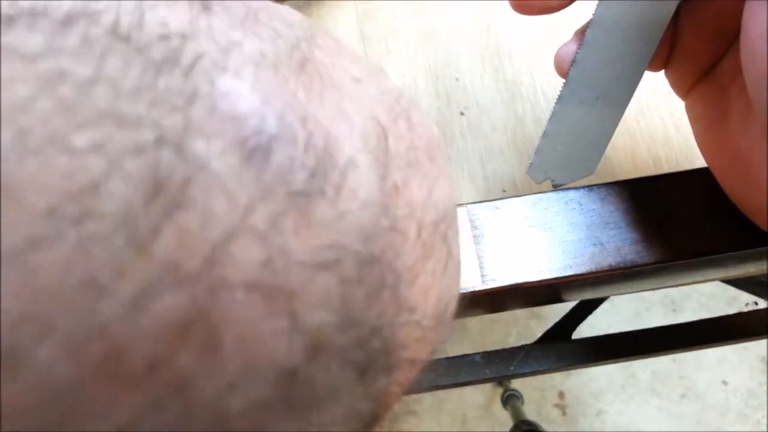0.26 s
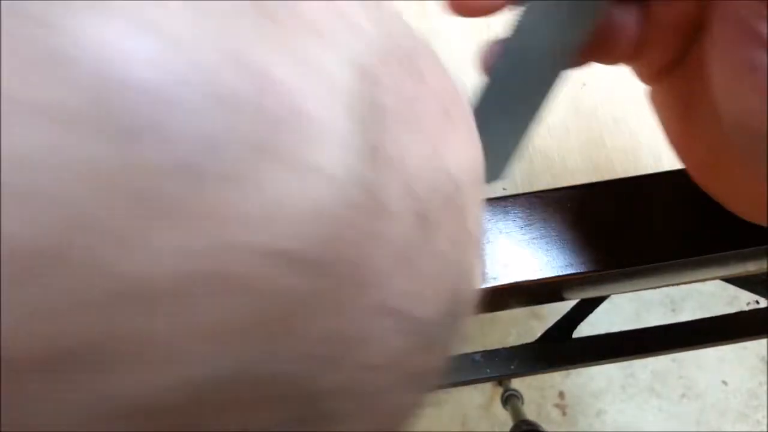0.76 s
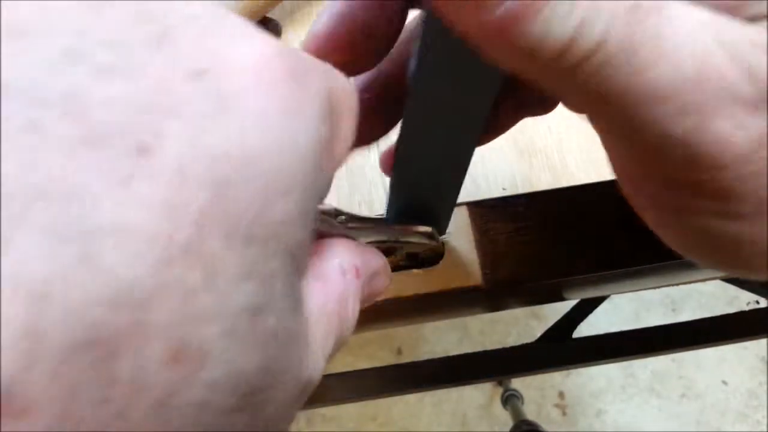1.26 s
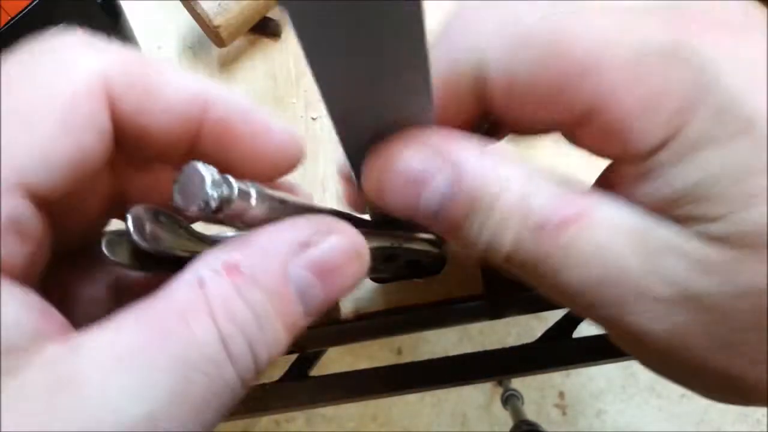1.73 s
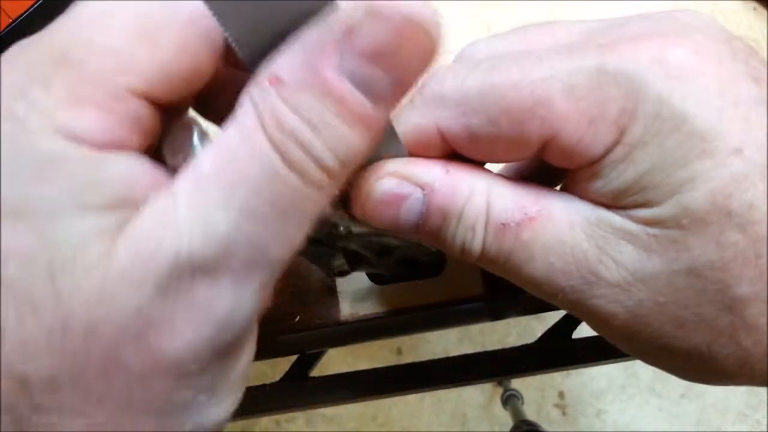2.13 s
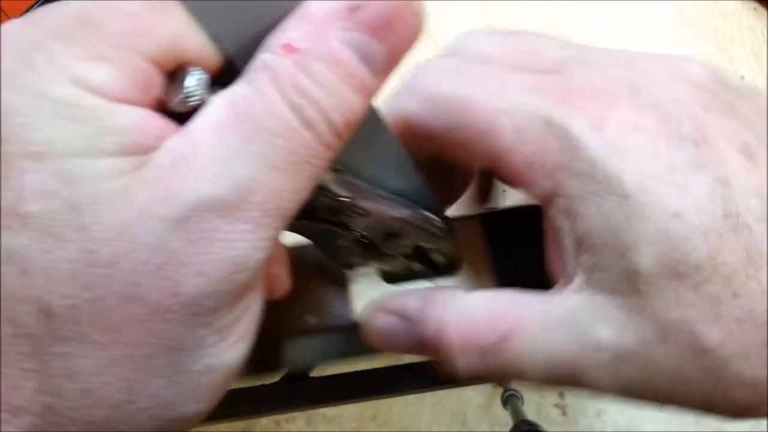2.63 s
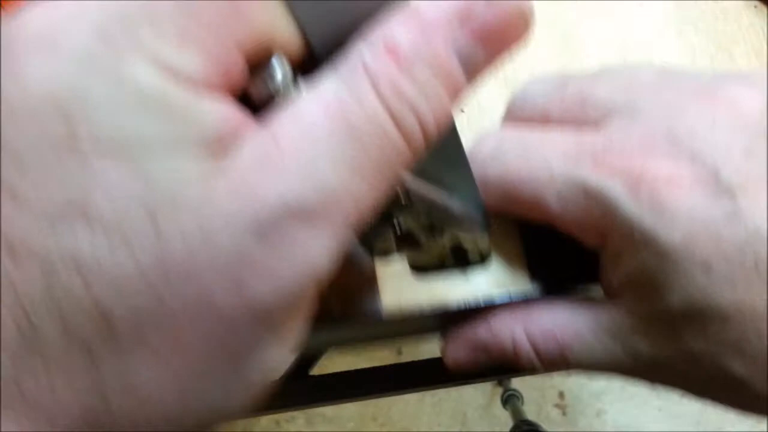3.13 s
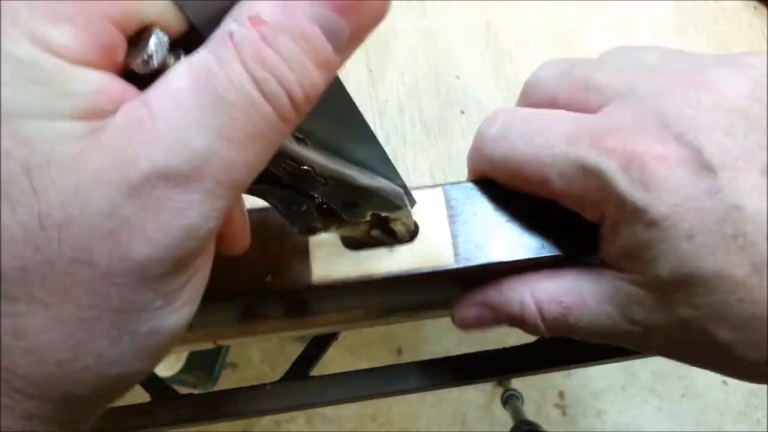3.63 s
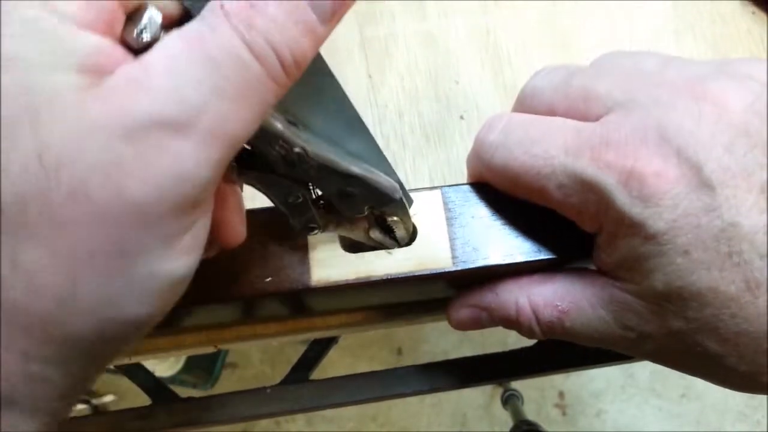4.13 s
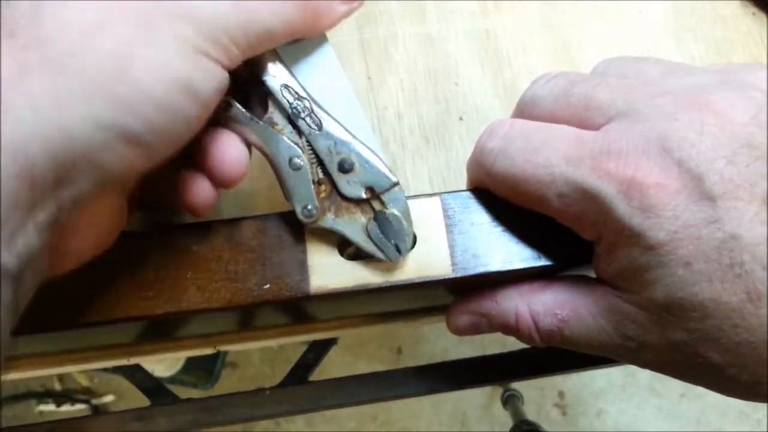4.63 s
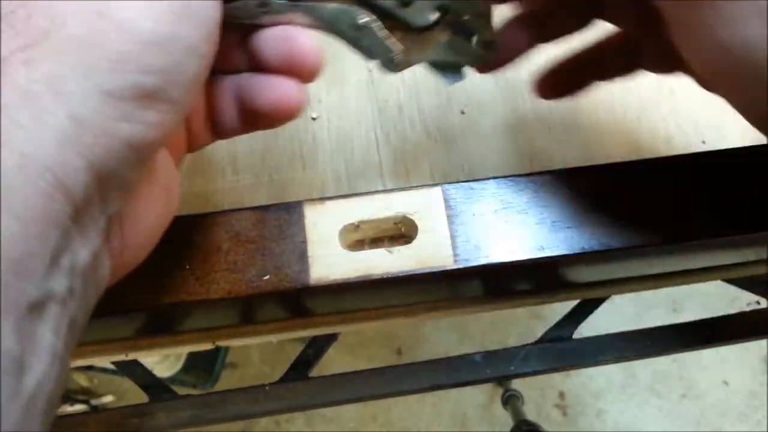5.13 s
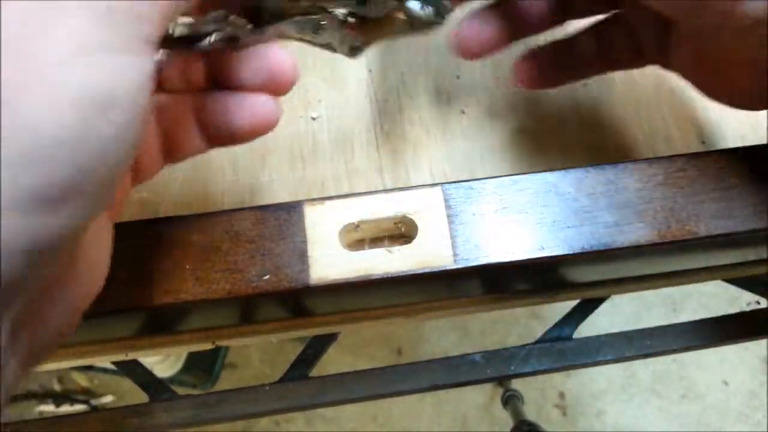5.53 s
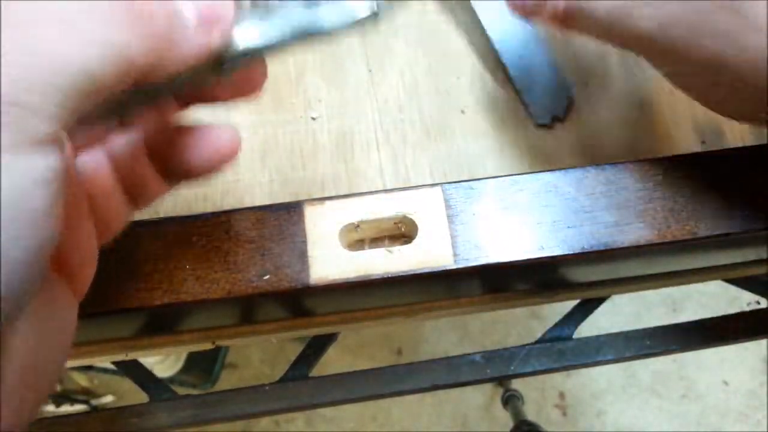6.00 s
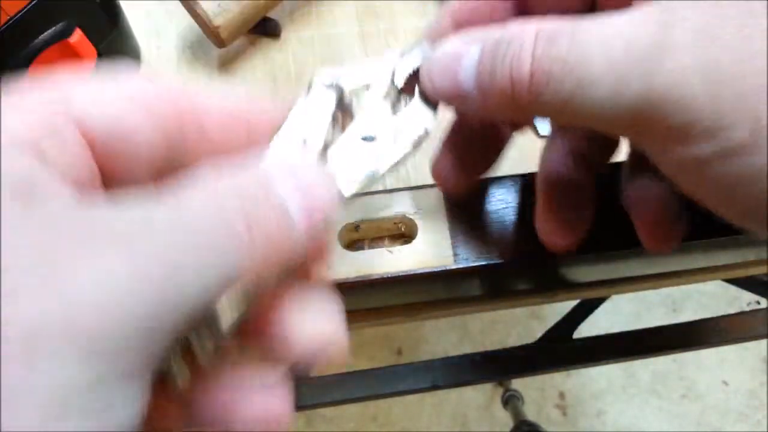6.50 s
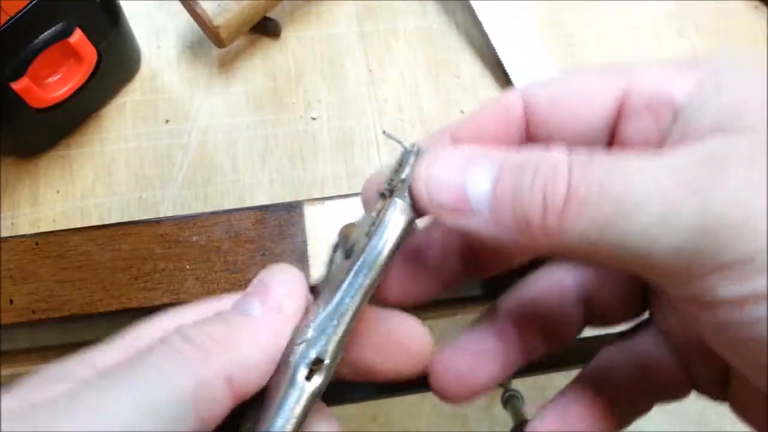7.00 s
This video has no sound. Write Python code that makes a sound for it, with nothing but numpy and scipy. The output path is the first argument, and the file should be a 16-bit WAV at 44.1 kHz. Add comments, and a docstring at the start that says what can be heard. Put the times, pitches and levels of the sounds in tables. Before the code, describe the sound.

Sharp clack, quiet tool fumbling, heavy woody thuds of pliers levering on a rail, then a thin steel plate rattles down, over hiss and ticking.

```python
"""Locking pliers lever a staple out of a wooden rail over a steel plate, close to a phone on a workshop bench.
Blows excite decaying modes of wood and steel and bursts of filtered noise; strokes are fluctuating noise
through resonances. At last the plate is dropped and chatters to rest in a hail of tiny impacts.
The shop answers the blows with a diffuse tail. Behind them lie a steady hiss and, almost wholly in the left
port, an electric tick thirty times a second."""
import sys
import numpy as np
from scipy import signal
from scipy.fft import rfft, irfft, next_fast_len
from scipy.io import wavfile
from scipy.ndimage import map_coordinates

SR = 44100
rng = np.random.default_rng(int(sys.argv[2]) if len(sys.argv) > 2 else 0)


def file_out(sig):
    """Save sig as 16-bit WAV at sys.argv[1]."""
    # one column per channel
    cols = np.atleast_2d(sig).T
    # limit, then scale
    lim = np.clip(cols, -1, 1)
    pcm = np.round(lim * 32767).astype(np.int16)
    wavfile.write(sys.argv[1], SR, pcm)


N = 319936

# Contacts of tools, rail and bench: (time [s], wood level [dB], wood centre [Hz], snap level [dB],
# hardness [dB], contact decay scale [s])
KNOCKS = [(.487, -37.5, 366, -26, -11, 0.011), (.521, -43, 256, -39, 9, 0.036),
          (0.5484, -12.5, 381, -2, -3, .012), (.5555, -29, 314, -13.5, -8, 0.01),
          (0.563, -20.5, 250, -37, -5, .017), (.822, -36, 298, -46, -6, .03),
          (.864, -33, 545, -58, -4, .03), (1.014, -47, 310, -37.5, 0.5, .044),
          (1.199, -39, 270, -56, -13, .025), (1.251, -36.5, 317, -65, 2, .03),
          (1.329, -39.5, 412, -56, 7, 0.033), (1.359, -29.5, 363, -49, -2, .053),
          (1.649, -37.5, 325, -46, -10, .03), (1.697, -39, 378, -45, 0, .03),
          (1.733, -32, 394, -65, 10.5, .03), (1.771, -40, 370, -44.5, 0.5, .065),
          (1.829, -53, 215, -51.5, 6.5, .04), (1.995, -27, 338, -41, -0.5, .054),
          (2.014, -26.5, 322, -54, 9.5, .03), (2.196, -27, 302, -41.5, 0, 0.027),
          (2.277, -41, 313, -39, 2.5, .048), (2.309, -36, 303, -71, 2, .025),
          (2.4, -42, 330, -39, -18, 0.04), (2.414, -30, 318, -49, 1, .026),
          (2.494, -35.5, 434, -37, -17, 0.022), (2.818, -27, 325, -42, -6, .03),
          (2.859, -26, 300, -23.5, -9, 0.057), (2.865, -1, 270, -11.5, -11, .029),
          (2.875, -3, 494, -11, -8.5, 0.03), (2.887, -9.5, 212, -22.5, -6, 0.099),
          (2.933, -21, 229, -39.5, 0, 0.21), (3.484, -5.5, 510, -3.5, -11, 0.035),
          (3.491, -3, 261, -19, -8, 0.008), (3.775, -37.5, 380, -37, -4, 0.14),
          (4.016, -40.5, 470, -31.5, -1.5, 0.029), (4.074, -47, 374, -39, 4.5, 0.035),
          (4.628, -32, 377, -34, -8, .04), (4.635, -4, 366, -16, -10, 0.028),
          (4.639, -14.5, 620, -21.5, -15, 0.022), (4.649, -15, 388, -32, -13, 0.13),
          (4.680, -16, 503, -23, -3.5, 0.025), (4.684, -9, 350, -31, -10, .03),
          (4.728, -31, 325, -49, -6, .023), (4.976, -32.5, 340, -36.5, -1, 0.03),
          (5.3006, -28.5, 524, -34, -11, .018), (5.319, -35, 239, -55, 2, .025),
          (5.35, -48, 242, -42.5, 10.5, .043), (5.379, -32, 298, -53, -5, .03),
          (5.387, -27.5, 400, -32.5, -9, 0.013), (5.439, -45, 275, -44.5, 6, .041),
          (5.509, -54, 229, -47.5, 7.5, 0.042), (5.664, -42, 277, -39, 4, 0.034),
          (6.504, -35, 260, -53, 1, 0.044), (6.548, -32, 552, -36.5, -0.5, 0.057),
          (6.574, -36.5, 226, -42, 0.5, 0.027)]
# Steel on steel: (time [s], ring level [dB], centre [Hz], span excited [octaves], share of free ring time [1])
CLINKS = [(0.341, -40.5, 3470, 0.43, .3), (0.399, -36, 3500, 0.39, 0.41), (.549, -1, 1890, 0.25, 0.14),
          (.550, -13, 3080, .1, 0.39), (.549, -21, 9300, 0.12, 0.96), (1.015, -33, 1427, 0.13, 0.83),
          (1.015, -39.5, 845, .1, 1), (1.016, -29.5, 4430, 0.47, 0.33), (1.359, -43, 1100, .15, 0.73),
          (1.699, -38, 1100, .15, 0.59), (1.772, -41, 1427, 0.13, 0.9), (2.015, -41.5, 1100, .15, 0.98),
          (2.278, -44, 3000, 0.15, .4), (4.681, -41.5, 3851, .06, 0.35), (4.975, -41, 2770, .15, .2),
          (5.301, -43.5, 2560, 0.05, 0.65), (5.301, -40, 4300, .08, 0.49), (5.387, -35, 1100, 0.15, 0.44),
          (5.388, -38, 4200, 0.15, 0.3), (5.993, -28, 3851, .04, 0.91)]
# The dropped plate meets the bench: (time [s], wood level [dB], wood centre [Hz], flex level [dB],
# clang level [dB], edge ring level [dB])
DROPS = [(5.9925, -8, 644, -13, -5.5, -27.5), (6.002, -8.5, 492, -24, -41, -55),
         (6.083, -5.5, 353, -12.5, -22, -38), (6.101, -14.5, 427, -31, -31, -29),
         (6.139, -10.5, 285, -9.5, 0.5, -8.5), (6.166, -38, 293, -11, -22, -16.5),
         (6.193, -14, 263, -12.5, -7.5, -10), (6.235, -21, 410, -9.5, -11, -24),
         (6.264, -26, 410, -24, -12, -17)]
# Strokes of hands dragging steel and wood over the bench: (time [s], length [s], rumble level [dB],
# rasp level [dB], scrape level [dB], change of level along the stroke [dB])
RUBS = [(0.727, 0.291, -43.5, -55, -57, -7), (1.04, .24, -50.5, -60, -59.5, -2),
        (1.614, .34, -51.5, -56.5, -78, -8.5), (2.2, .36, -56.5, -80, -98, -2),
        (2.753, 0.053, -47, -46.5, -58, 6.5), (2.784, 0.1, -40, -41.5, -56, -3),
        (3.541, 0.2, -35.5, -42.5, -60, -10.5), (3.79, 0.048, -45, -39.5, -51.5, -15),
        (5.316, 0.068, -45.5, -50.5, -53.5, 2.5), (5.419, .5, -48.5, -54, -52.5, -4.5)]

# Modes of the wood: (frequency [Hz], relative level [dB], free t60 [s])
WOOD_MODES = [(195, -10, 0.05), (232, 7.5, 0.038), (257, -8, 0.064), (276, -4.5, 0.1), (321, 7.5, 0.069),
              (371, -3.5, 0.1), (417, 9.5, 0.062), (515, 6.5, 0.095), (610, 7, 0.051), (650.6, 1, 0.15),
              (703, 7, 0.08)]
# Modes of the pliers: (frequency [Hz], relative level [dB], free t60 [s])
PLIERS_MODES = [(845, -2, .08), (1100, -2, .1), (1427, -2, .11), (1950, -6, .08), (2083, 0, .11),
                (2191, -4, .25), (2350, -5, .12), (2530, -3, .2), (3079, 0, .22), (3851, -14, .35),
                (4300, -4, .15), (5200, -4, .08), (8600, -4, .1), (8900, -2, .1), (9205, 0, .14),
                (9450, -2, .1), (9771, -2, .14), (10100, -3, .1)]
# Flexing modes of the plate: (frequency [Hz], relative level [dB], free t60 [s])
FLEX_MODES = [(1050, -8, .04), (1250, -8, .04), (1390, 0, .06), (1480, -5, .04), (1700, -7, .03),
              (1900, -6, .04), (2128, 0, .06), (2257, -2, .05), (2500, -5, .04), (2650, -7, .03)]
# Clanging modes of the plate: (frequency [Hz], relative level [dB], free t60 [s])
CLANG_MODES = [(2821, -4, .05), (3025, -5, .05), (3300, -6, .04), (3537, -4, .05), (3851, -13, .2),
               (4120, -7, .05), (4500, 0, .04), (4800, -5, .03), (5400, -14, .03), (6200, -12, .03),
               (6600, -8, .04), (6934, -6, .06), (7549, -18, .15)]
# High edge modes of the plate: (frequency [Hz], relative level [dB], free t60 [s])
EDGE_MODES = [(8150, -20, .12), (9000, -15, .15), (9905, -14, .13), (10409, -9, .16), (10821, -7, .12),
              (11097, -11, .3), (11505, 0, .15), (12233, 0, .12), (12870, -5, .1), (13652, -10, .14),
              (14041, -12, .14), (14520, -8, .15)]

# Rail resonances: (frequency [Hz], width [Hz], relative level [dB])
RAIL_PEAKS = [(811, 121, -0.5), (1105, 103, 0.5), (1310, 158, 1), (1493, 480, -4), (1960, 420, -5)]
# Spectrum of the crack of a contact: (frequency [Hz], relative density [dB per Hz])
CRACK_SPECTRUM = [(1500, -38.5), (2100, -7), (3100, -2.5), (4500, -9.5), (6000, -28)]
# Spectrum of the brightest spray of a contact: (frequency [Hz], relative density [dB per Hz])
SPRAY_SPECTRUM = [(4500, -30), (6500, 2.5), (9000, -3), (14000, -5.5), (15400, -32)]
# High resonances that a drag excites: (frequency [Hz], width [Hz], relative level [dB])
SCRAPE_PEAKS = [(2360, 240, -25), (2850, 79, 6.5), (3380, 120, -1.5), (3890, 880, 7.5), (4500, 47, 8.5),
                (4840, 33, 1), (6560, 480, -3.5), (8400, 36, -2.5)]
# Low resonances that a drag excites: (frequency [Hz], width [Hz], relative level [dB])
RUMBLE_PEAKS = [(261, 139, 3.5), (331, 76, 8.5), (514, 107, 1)]

# Balance of near sounds between the ports: (frequency [Hz], left minus right [dB])
PORT_BALANCE = [(60, 20), (110, -4), (200, 0), (380, 2), (700, 0), (1280, -6), (2370, 3.5), (4370, -2.5),
                (8060, -5), (14900, -3)]
# Decay of the shop's answer: (frequency [Hz], t60 [s])
SHOP_DECAY = [(150, 0.26), (700, 0.36), (2000, 0.4), (5000, 0.35), (12000, 0.091)]
# Hiss of shop and microphones: (frequency [Hz], left relative density [dB per Hz],
# right relative density [dB per Hz])
HISS_SPECTRUM = [(25, -31.5, -17), (49, -16.5, -20.5), (116, -4, -6), (240, -0.5, -4.5), (538, -7, -12.5),
                 (965, -18, -16.5), (2150, -20, -20.5), (4650, -19.5, -21.5), (6100, -33, -25),
                 (7950, -29, -24), (10120, -20, -27), (11500, -23, -26.5), (14300, -23, -28),
                 (14500, -36, -57)]

PUSH_DB, PUSH_S = -10.5, 0.0014  # shove of a contact on the bench top: level over the snap, time to its peak
TOUCH_S = 0.028  # a stroke fades in and out over this
# the plate rocking to rest: impacts grow until it slaps flat, hold, then die ever faster (times in s)
ROCK_S, SLAP_S, LOSE_S, REST_S = 6.09, 6.14, 6.24, 6.4
GROW_DB, DIE_DB, DIE_POWER = 13.5, 35, 1.83
EDGE_DB, EDGE_SAG_DB_PER_S = -20, 61.5  # feed of the edge ring from the slap on
LANDING_DB, LANDING_S = 6, 0.0043  # lift of the hail after a landing; its delay and Gaussian width
TICK_RATE, TICK_START, TICK_WIDTH_S = 30.047, .0209, .00142  # ticks per s, first tick (s), pulse width
TOP_HZ = 15470  # band limit


def knocks():
    """Impact excitation: a contact thumps the bench and sheds noise, the brighter the harder the contact."""
    out, t = np.zeros((2, N + SR)), np.arange(SR // 5) / SR
    push = np.tile(t / PUSH_S * np.exp(1 - t / PUSH_S), (2, 1))
    snap = unit(filtered(pair(1037), bank(RAIL_PEAKS)))
    crack = unit(filtered(pair(1680), spectrum(CRACK_SPECTRUM)))
    spray = unit(filtered(pair(2500), spectrum(SPRAY_SPECTRUM)))
    for s, wood_db, centre, snap_db, hard_db, decay_s in KNOCKS:
        now = slice(round(s * SR), round(s * SR) + len(t))
        rise = 1 - np.exp(-t / (0.059 * decay_s))
        # hardness lifts the crack once and the spray twice; brighter layers die sooner
        layers = [(snap, snap_db, 1.29),
                  (crack, snap_db + hard_db + 0.5, 0.83),
                  (spray, snap_db + 2 * hard_db, 0.32)]
        add(out, s, amp(wood_db) * ring(WOOD_MODES, 0.00416, 1.0, centre, octaves=0.26, free=0.64))
        add(out, s, amp(snap_db + PUSH_DB) * push)
        for noise, db, stretch in layers:
            fade = amp(-60 * t / (stretch * decay_s))
            add(out, s, amp(db) * fade * rise * noise[:, now])
    return out[:, :N]


def clinks():
    """Modal vibration: steel on steel rings the pliers' modes near the pitch of the struck spot."""
    out = np.zeros((2, N + SR))
    for s, db, centre, octaves, free in CLINKS:
        add(out, s, amp(db) * ring(PLIERS_MODES, .0005, .5, centre, octaves, free))
    return out[:, :N]


def plate():
    """Modal impact: each landing of the dropped plate rings the wood and three groups of plate modes."""
    out = np.zeros((2, N + SR))
    for s, wood_db, centre, flex_db, clang_db, edge_db in DROPS:
        add(out, s, amp(wood_db) * ring(WOOD_MODES, 0.0019, 0.99, centre, 0.52, 0.71))
        add(out, s, amp(flex_db) * ring(FLEX_MODES, 0.00094, 1.8, free=0.98))
        add(out, s, amp(clang_db) * ring(CLANG_MODES, 0.000332, 1.6, free=0.56))
        add(out, s, amp(edge_db) * ring(EDGE_MODES, 0.00044, 0.22))
    return out[:, :N]


def rocking():
    """Convolution of impulses with modes: a hail of tiny impacts drives wood and plate until they rest."""
    out, t = np.zeros((2, N + SR)), np.arange(ROCK_S, REST_S, 1 / SR)
    growing = np.clip((SLAP_S - t) / (SLAP_S - ROCK_S), 0, 1)
    dying = np.clip((t - LOSE_S) / (REST_S - LOSE_S), 0, 1)
    loss_db = GROW_DB * growing + DIE_DB * dying ** DIE_POWER

    hits = rng.random(len(t)) < 3000 / SR  # 3000 impacts a second on average
    hail = hits * rng.standard_normal(len(t)) * amp(2 * rng.standard_normal(len(t)))
    landings = sum(np.exp(-((t - row[0] - LANDING_S) / LANDING_S) ** 2) for row in DROPS)
    hail *= amp(wobble(72.5)[:len(t)] + LANDING_DB * landings)  # the impacts come in clumps
    hail = unit(hail)

    edge_feed = (t > SLAP_S) * amp(EDGE_DB - EDGE_SAG_DB_PER_S * (t - SLAP_S))
    # modes, gain of their feed, share of free ring time
    bodies = [(WOOD_MODES, amp(-29.5), 0.26), (FLEX_MODES, amp(-28), 0.38),
              (CLANG_MODES, amp(-26.5), 0.45), (EDGE_MODES, edge_feed, 0.93)]
    for modes, feed, free in bodies:
        body = ring(modes, 0.000399, 2.4, free=free)
        body = body / np.linalg.norm(body[0])
        drive = hail * feed * amp(-loss_db)
        add(out, ROCK_S, signal.fftconvolve(drive[None], body, axes=1))
    return out[:, :N]


def rubs():
    """Friction as random excitation: uneven noise drives the resonances of bench, rail and steel."""
    t, out = np.arange(N) / SR, np.zeros((2, N))
    rasp_peaks = RAIL_PEAKS + [(1133, 22, 2.0), (2320, 530, -9)]
    rumble = unit(filtered(amp(1.5 * wobble(45)) * pair(860), bank(RUMBLE_PEAKS)))
    rasp = unit(filtered(amp(1.9 * wobble(83)) * pair(750), bank(rasp_peaks)))
    scrape = unit(filtered(amp(3.2 * wobble(87)) * pair(2700), bank(SCRAPE_PEAKS)))
    for s, length, rumble_db, rasp_db, scrape_db, change_db in RUBS:
        gate = np.interp(t, [s - TOUCH_S, s, s + length, s + length + TOUCH_S], [0, 1, 1, 0])
        pressure = amp(change_db * np.clip((t - s) / length, 0, 1))
        drag = amp(rumble_db) * rumble + amp(rasp_db) * rasp + amp(scrape_db) * scrape
        out += gate * pressure * drag
    return out


def shop(x):
    """Reverberation: a diffuse noise tail in which each frequency dies at its own speed."""
    hz, t, z = signal.stft(rng.standard_normal((2, SR // 2)), SR, nperseg=256)
    decay = amp(-60 * t / along(SHOP_DECAY, hz).T)
    tail = signal.istft(z * decay, SR, nperseg=256)[1]
    late = np.pad(x, ((0, 0), (200, 0)))  # delay in samples
    return signal.fftconvolve(late, tail / np.linalg.norm(tail[0]), axes=1)[:, :N]


def hiss():
    """Stationary noise: shop air shared in the deep bass, under unrelated port hiss, wandering a little."""
    noise = unit(filtered(pair(150), spectrum(HISS_SPECTRUM)))
    return amp(-49.5 + wobble(2.146)) * noise


def tick():
    """Transient response: both edges of a short square current pulse ring through the input filter."""
    t = np.arange(N) / SR - TICK_START
    high = t * TICK_RATE % 1 < TICK_WIDTH_S * TICK_RATE
    pulse = high * amp(.8 * wobble(25))
    edges = signal.sosfilt(signal.butter(3, 260, "high", fs=SR, output="sos"), pulse)
    soft = signal.sosfilt(signal.butter(2, 1500, "low", fs=SR, output="sos"), edges)
    return amp(-28.5) * soft * np.array([[1], [-.05]])  # left, faint and inverted right


def ring(modes, attack, early, centre=1000, octaves=9, free=1):
    """Modal superposition: one stereo blow of peak 1, favouring the modes near the struck spot's pitch."""
    hz, db, t60 = np.transpose(modes)[..., None]
    t60 = free * t60  # a hand or the bench shortens the ring
    t = np.arange(int(SR * t60.max())) / SR
    level_luck, port_luck, phase_luck = rng.standard_normal((3, len(modes), 1))
    db = db + 2 * level_luck - 6 * (np.log2(hz / centre) / octaves) ** 2
    turn = np.clip(hz / 1800, 0, 1.4) ** 2 * port_luck  # short waves reach the ports out of step
    phase = 2 * np.pi * hz * (t - attack) + 0.98 * phase_luck  # roughly in step one attack time in
    fade = amp(-60 * t / t60) + early * amp(-60 * t / (0.19 * t60))  # the contact damps the first cycles fast
    waves = np.sin([phase + turn / 2, phase - turn / 2])
    out = (amp(db) * fade * waves).sum(1) * (1 - np.exp(-t / attack))
    return out / np.abs(out).max()


def bank(peaks):
    """Parallel resonance: the response of band-pass peaks side by side, alternating in sign."""
    def response(f):
        total = 0
        for k, (centre, width, db) in enumerate(peaks):
            damping = 1j * f * width
            total = total + (-1) ** k * amp(db) * damping / (centre ** 2 - f ** 2 + damping)
        return total
    return response


def spectrum(points):
    """Spectral shaping: a gain over frequency through the tabled levels."""
    return lambda hz: amp(along(points, hz))


def pair(mono_hz):
    """Coherence: stereo noise, alike at both ports far below mono_hz and unrelated far above."""
    def mid_side(hz):
        turn = np.arccos(1 / (1 + (hz / mono_hz) ** 2)) / 2
        return np.array([np.cos(turn), np.sin(turn)])
    mid, side = filtered(rng.standard_normal((2, N)), mid_side)
    return np.array([mid + side, mid - side])


def filtered(x, response):
    """Linear filtering: the spectrum of x times a complex response of frequency."""
    m = next_fast_len(N + SR // 2)
    return irfft(rfft(x, m) * response(np.fft.rfftfreq(m, 1 / SR)), m)[..., :N]


def wobble(rate):
    """Random modulation: a smooth curve through random knots, rate knots a second."""
    return map_coordinates(rng.standard_normal(int(N * rate / SR) + 4), [np.arange(N) * rate / SR])


def along(points, hz):
    """Interpolation: each column after the frequency, read on a log axis."""
    f, *cols = np.transpose(points)
    return np.array([np.interp(np.log(hz + 1), np.log(f + 1), c) for c in cols])


def amp(db):
    """Decibel law: the gain of a level in dB."""
    return 10 ** (np.asarray(db) / 20)


def unit(x):
    """Normalisation: x scaled to rms 1."""
    return x / np.sqrt(np.mean(x ** 2) + 1e-20)


def add(track, s, sound):
    """Superposition: mix a stereo sound in at time s."""
    track[:, round(s * SR):][:, :sound.shape[1]] += sound


def scene():
    """Superposition: blows lose deep bass and take the ports' balance; the shop answers them."""
    blows = knocks() + clinks() + plate() + rocking()
    near = signal.sosfilt(signal.butter(3, 140, "highpass", fs=SR, output="sos"), blows)
    near = filtered(near, lambda hz: amp(along(PORT_BALANCE, hz) * [[.5], [-.5]]))
    return near + amp(-13.0) * shop(near) + rubs() + hiss() + tick()


def record(dry):
    """Saturation: the loudest blows flatten at full scale; nothing is kept above the band limit."""
    clipped = dry / (1 + np.abs(dry) ** 6) ** (1 / 6)
    return filtered(clipped, lambda hz: hz < TOP_HZ)


dry = scene()
out = record(dry)
file_out(out)
```